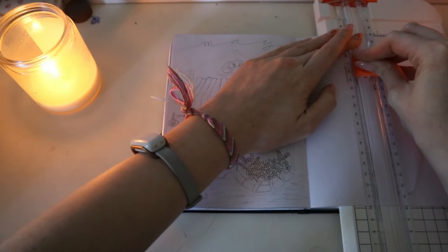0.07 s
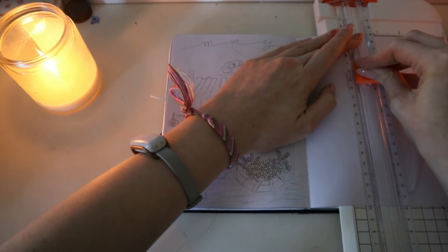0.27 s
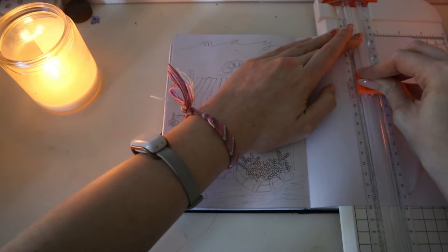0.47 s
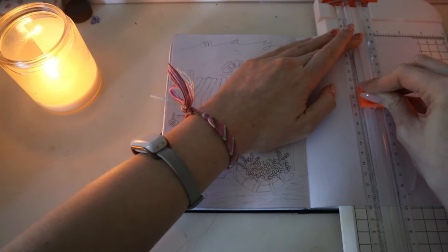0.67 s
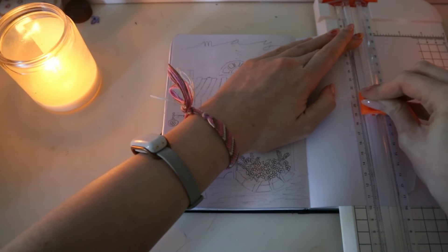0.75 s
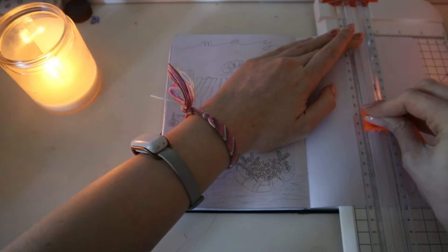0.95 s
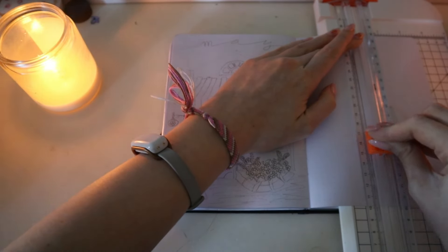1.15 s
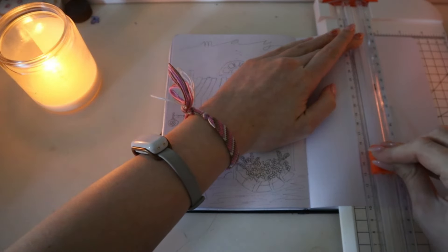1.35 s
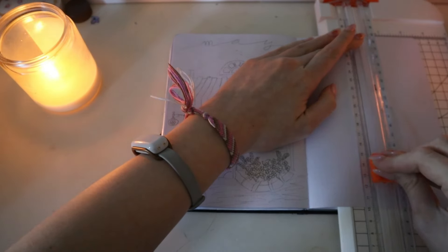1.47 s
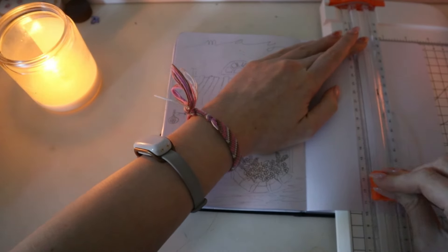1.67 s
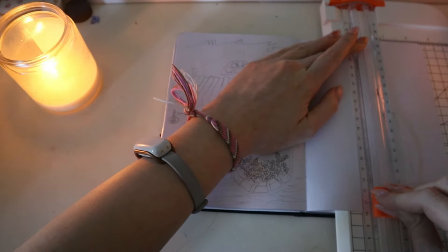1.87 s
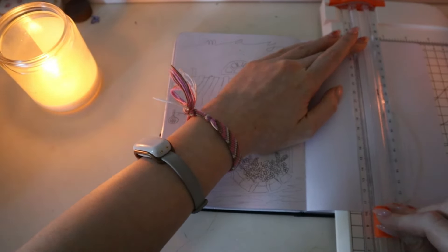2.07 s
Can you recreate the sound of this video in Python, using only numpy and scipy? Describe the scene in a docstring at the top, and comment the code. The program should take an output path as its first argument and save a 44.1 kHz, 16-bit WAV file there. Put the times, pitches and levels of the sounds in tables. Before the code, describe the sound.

A paper trimmer blade slices along its rail in one continuous, bright, uneven hiss from 0 to about 2.05 seconds, slightly right of centre. A small tick comes at 0.2, then rougher plastic rubbing. A wavering squeak rises from 0.56 to 0.78. Rubbing eases after 1.2; a sharp click and dull knocks cluster at 1.57-1.63, with lighter ticks at 1.72 and 1.79. Quiet, dry room, faint low hum.

```python
"""Paper trimmer on a desk

A blade carriage is drawn slowly down its rail in a quiet room, heard in stereo a little to the right.
Paper fibres tear: random clicks and noise excite a broad hiss and the modes of ruler arm and sheet.
The carriage rubs and once squeaks on the rail by stick-slip, and catches with knocks that ring modes.
Filtered noise makes the room tone and the appliance hum below; feedback delays make the room's echo.
"""
import sys
import numpy as np
from scipy import signal
from scipy.fft import rfft, irfft, next_fast_len
from scipy.io import wavfile

SR = 44100
rng = np.random.default_rng(int(sys.argv[2]) if len(sys.argv) > 2 else 0)


def output_pcm(signal):
    """Save a mono or channel-first signal as 16-bit PCM at the path in sys.argv[1].

    Samples are clipped to [-1, 1] before scaling.
    """
    pcm = np.clip(np.atleast_2d(signal).T, -1, 1) * 32767
    wavfile.write(sys.argv[1], SR, np.round(pcm).astype(np.int16))


def how_loud(loudness_db):
    """Turn decibels into a plain amplitude multiplier (0 dB gives 1, 20 dB gives 10)."""
    steps = np.asarray(loudness_db, float) / 20
    return 10 ** steps


N = 92610


def rms_one(x):
    """Scale to rms 1."""
    return x / np.sqrt(np.mean(x ** 2) + 1e-20)


def in_time(rows):
    """Columns of a curve table, sample by sample."""
    s, *columns = np.transpose(rows)
    return [np.interp(np.arange(N) / SR, s, c) for c in columns]


def at_hz(points, hz):
    """Read a table on a log-frequency axis."""
    table_hz, values = np.array(points).T
    return np.interp(np.log(hz), np.log(table_hz), values)


def drift(rate_hz):
    """Slow chance: noise through two equal one-pole low-passes at rate_hz, spread 1."""
    r = np.exp(-8 * np.pi * rate_hz / SR)  # drawn at a quarter of the sample rate
    slow = signal.lfilter([1], [1, -2 * r, r * r], rng.standard_normal(N // 4 + 8002))[8000:]
    return np.interp(np.arange(N) / 4, np.arange(len(slow)), rms_one(slow))


def colour(x, spectrum):
    """Shape by a spectrum table."""
    hz = np.maximum(np.fft.rfftfreq(N, 1 / SR), 1)
    return irfft(rfft(x) * how_loud(at_hz(spectrum, hz)), N)


def butter_filter(x, order, hz, kind):
    """Butterworth filter."""
    return signal.sosfilt(signal.butter(order, hz, kind, fs=SR, output="sos"), x)


def resonate(x, hz, width):
    """Two-pole resonance with gain 1 on top."""
    r = np.exp(-np.pi * width / SR)
    poles = [1, -2 * r * np.cos(2 * np.pi * hz / SR), r * r]
    return signal.lfilter(np.array([1, 0, -1]) * (1 - r * r) / 2, poles, x)


def ring(clicks, modes):
    """Clicks set every mode of a body ringing; each mode decays by 60 dB in its t60 [s]."""
    out = 0
    for hz, db, t60 in modes:
        r, w = how_loud(-60 / (t60 * SR)), 2 * np.pi * hz / SR
        out = out + how_loud(db) * signal.lfilter([0, np.sin(w)], [1, -2 * r * np.cos(w), r * r], clicks + 1e-18)
    return out


def grains(rate, spread_db):
    """Random clicks, rate per second on average, of uneven size and sign."""
    size = how_loud(spread_db * np.minimum(rng.exponential(1, N), 5)) * rng.choice([-1, 1], N)
    return rms_one(size * (rng.random(N) < rate / SR))


def along_rail(force, modes, depth_db):
    """Each mode swells and fades as the carriage passes its antinodes and nodes."""
    carriage_cm_per_s, wander_db = 14, 1.4
    cm = carriage_cm_per_s * np.arange(N) / SR
    total = 0
    for k, (hz, width, db, antinode_cm, spacing_cm) in enumerate(modes):
        swell_db = depth_db * np.cos(2 * np.pi * (cm - antinode_cm) / spacing_cm)
        gain = how_loud(db + swell_db + wander_db * drift(4.3))
        total = total + (-1) ** k * gain * resonate(force, hz, width)
    return rms_one(total)


def sheet_modes(spectrum):
    """Many small modes of the sheet at chance pitches, their levels following the hiss spectrum."""
    count, low_hz, top_hz, width_hz = 44, 1516, 11978, 35
    pitch, place, spacing = rng.random((count, 3)).T
    hz = low_hz + (top_hz - low_hz) * (np.arange(count) + pitch) / count
    return [(f, width_hz, at_hz(spectrum, f), 30 * p, 4.9 + 12 * s) for f, p, s in zip(hz, place, spacing)]


def sinking_ring():
    """A ring of the sheet that sinks as the cut lengthens: narrow noise carried on a falling pitch."""
    # (time [s], pitch [Hz], level relative to the hiss treble [dB])
    sinking_curve = [(.9, 11280, -35), (1.05, 10900, -12), (1.3, 10360, -7), (1.55, 9960, -7),
                     (1.85, 9760, -6.5)]
    spread_hz = 300  # low-pass of the noise on the carrier
    hz, db = in_time(sinking_curve)
    turn = 2 * np.pi * np.cumsum(hz) / SR
    return how_loud(db) * (drift(spread_hz) * np.cos(turn) + drift(spread_hz) * np.sin(turn))


def cut():
    """Tearing fibres excite a broad hiss, the modes of the arm and of the sheet; direct and diffuse parts."""
    # blade in the paper: (time [s], treble level [dB], lower treble relative to it [dB])
    cut_curve = [(0.0, -44, 2), (0.15, -47.5, -6), (0.25, -45.5, 1), (0.3, -42.5, -5.5), (0.33, -48, 2),
                 (0.53, -40.5, -5), (0.64, -41, 2), (0.72, -42, -0.5), (0.81, -38.5, -3.5),
                 (0.92, -43, -1.5), (1.04, -39.5, -3), (1.11, -41, -0.5), (1.19, -38.5, -3.5),
                 (1.6, -45.5, 1), (1.68, -41.5, -2), (1.69, -49, -0.5), (1.75, -40.5, -3),
                 (1.76, -47.5, 0.5), (1.82, -39.5, -2), (1.85, -44, -2.5), (1.91, -42.5, -1),
                 (1.95, -49.5, 1), (1.97, -40.5, -3), (2.03, -44, -3), (2.05, -62, 10), (2.1, -70, 10)]
    # hiss of the sheet: (frequency [Hz], relative density [dB per Hz])
    sheet_spectrum = [(760, -17), (1300, -9.5), (1980, -1), (2300, -4.5), (2600, -6.5), (3790, -2.5),
                      (5260, -1), (6580, 0.5), (8940, -2.5), (10500, 5), (12100, -5), (14900, -18)]
    # modes of rail and ruler arm, driven best where the blade crosses their antinodes:
    # (frequency [Hz], width [Hz], level [dB], an antinode along the cut [cm], antinode spacing [cm])
    arm_rail_modes = [(1447, 81, -0.5, 4.1, 27), (1800, 47, 7.5, 15.4, 10.8), (2392, 84, 4.5, 28, 23.2),
                      (2808, 164, 8, 2.2, 41.7), (2960, 190, -1.5, 10.4, 34), (3182, 50, 9, 32.4, 47),
                      (3745, 114, 2.5, 16.1, 28), (4210, 97, 8, 30, 80), (4520, 142, -4.5, 13.9, 10.8),
                      (4760, 37, 8.5, 25, 15.5), (5550, 37, 0, 14, 38), (5720, 60, 6, 5.1, 70),
                      (6605, 146, 4.5, 25.8, 9.7), (7350, 130, -18, 4.4, 11.5), (7400, 230, 6, 0.79, 33.3),
                      (7950, 140, 0, 20.5, 18), (8087, 110, 11, 2.7, 13.2), (8620, 320, 10, 5.9, 17.1),
                      (9380, 68, 8.5, 5.8, 15.4), (9780, 180, 9.5, 30, 24.6), (9790, 250, 8, 10.2, 5.3),
                      (11800, 69, 9, 16, 28)]
    # a hollow in the hiss: (time [s], share removed [0-1])
    hollow_curve = [(0, 0.7), (.15, 0.71), (.26, 0.86), (.3, 0.045), (.8, 0.24), (1.0, 0.24), (1.1, 0.1),
                    (1.3, 0.19), (1.6, 0.37), (1.8, 0.35), (2.1, 0.1)]
    # highest treble: (time [s], level change [dB])
    top_curve = [(0, 3), (.9, -3), (1.35, -6), (1.5, -1), (1.7, -1), (2.1, -12)]
    fibres_per_s, fibre_spread_db, flutter_db = 9000, 1.5, 0.51
    hollow_hz, hollow_width_hz, split_hz, top_from_hz = 4940, 2740, 3550, 15200

    # row 0 is the direct sound, rows 1 and 2 feed the two diffuse channels
    fibres = np.array([grains(fibres_per_s, fibre_spread_db), rng.standard_normal(N), rng.standard_normal(N)])
    hiss = rms_one(colour(fibres, sheet_spectrum))
    arm = along_rail(fibres, arm_rail_modes, 6.5)
    sheet = along_rail(fibres, sheet_modes(sheet_spectrum), 13)
    sound = hiss + arm + how_loud(-7) * sheet
    removed = np.clip(in_time(hollow_curve)[0], 0, 1)
    sound = sound - removed * resonate(sound, hollow_hz, hollow_width_hz)

    low = rms_one(butter_filter(sound, 4, split_hz, "low"))
    high = rms_one(butter_filter(sound, 4, split_hz, "high"))
    top = signal.sosfiltfilt(signal.butter(2, top_from_hz, "high", fs=SR, output="sos"), high)
    high = high + (how_loud(in_time(top_curve)[0]) - 1) * top
    high[0] += sinking_ring()
    level_db, low_db = in_time(cut_curve)
    flutter = flutter_db * (drift(9.4) + drift(33.0))
    return how_loud(level_db + flutter) * (high + how_loud(low_db) * low)


def rub():
    """Uneven slips of the carriage ring the rail."""
    # carriage rubbing on the rail: (time [s], level [dB])
    rub_curve = [(0, -41.5), (.18, -46.5), (.215, -35), (.26, -43), (.3, -33.5), (.34, -41), (.42, -40.5),
                 (.54, -36), (.65, -36), (.74, -35.5), (.8, -34), (.93, -38), (1.03, -35), (1.06, -36),
                 (1.12, -34), (1.22, -42.5), (1.41, -44), (1.44, -48.5), (1.53, -50), (1.6, -47.5),
                 (1.75, -49.5), (1.79, -43), (1.84, -54.5), (2.03, -58.5), (2.1, -70)]
    # rail modes:
    # (frequency [Hz], width [Hz], level [dB], an antinode along the cut [cm], antinode spacing [cm])
    rail_modes = [(536, 106, -16, 1.6, 22), (688.5, 83, -9, 25, 96), (759, 78, -3, 8.2, 9.4),
                  (832, 92, -1, 19.4, 47), (910, 101, -2, 18.5, 37), (981, 109, -2, 14.7, 20),
                  (1070, 113, -3, 2.7, 12.35), (1138, 93, -4.5, 4.1, 12.2), (1274, 110, -12.5, 2.2, 34)]
    slips_per_s, slip_spread_db, node_depth_db = 2200, 2, 2.5
    level_db, = in_time(rub_curve)
    rings = along_rail(grains(slips_per_s, slip_spread_db), rail_modes, node_depth_db)
    return how_loud(level_db) * rms_one(butter_filter(rings, 2, [480, 1450], "band"))


def squeak():
    """Regular stick-slip: a wavering tone with broken, blurred overtones."""
    # (time [s], pitch [Hz], level [dB], second partial level [dB], third partial level [dB])
    squeak_curve = [(.557, 849.6, -35, -58, -52), (.56, 856.4, -30, -51, -40), (.574, 848, -22, -41.5, -45),
                    (.582, 884, -27.5, -37, -52), (.589, 959.5, -31.5, -52, -44), (.6, 986, -33, -53, -45),
                    (.612, 873, -27, -32.5, -55), (.618, 833, -23.5, -56, -40),
                    (.624, 763.6, -31, -36, -42), (.64, 759, -24.5, -37, -40), (.646, 759, -37, -36, -63),
                    (.652, 795, -32, -47, -36), (.66, 788.6, -24.5, -36, -36.5),
                    (.67, 818.5, -25.5, -52, -38), (.679, 848, -20.5, -32.5, -49),
                    (.688, 896, -24.5, -33.5, -47.5), (.7, 883, -25.5, -36, -45),
                    (.718, 890, -25, -31.5, -39), (.73, 1003, -29, -43, -48), (.738, 1087, -34, -37.5, -43),
                    (.744, 1087, -42, -46, -42), (.751, 1125, -25, -36, -49), (.76, 1124, -37, -38, -52),
                    (.773, 1167, -24.5, -42, -59), (.78, 1177, -42, -38, -62)]
    # higher partials: (multiple of the pitch [1], level relative to the third [dB])
    higher_partials = [(4, -8), (5, -12.5)]
    jitter_share, shimmer_db = .007, .7
    overtone_shimmer_db, overtone_blur_rad = 2.2, .4
    hz, level_db, second_db, third_db = in_time(squeak_curve)
    turn = 2 * np.pi * np.cumsum(hz * (1 + jitter_share * drift(140.0))) / SR
    tone = how_loud(level_db + shimmer_db * drift(85.0)) * np.sin(turn)
    overtones = [(2, second_db), (3, third_db)]
    overtones += [(round(k), third_db + db) for k, db in higher_partials]
    for k, db in overtones:
        gain = how_loud(db + overtone_shimmer_db * drift(90.0))
        tone = tone + gain * np.sin(k * turn + overtone_blur_rad * drift(120.0))
    t = np.arange(N) / SR
    sounding = (t > squeak_curve[0][0]) & (t < squeak_curve[-1][0])
    return np.sqrt(2) * tone * sounding  # levels are rms


def knocks():
    """The carriage catches: ticks on the arm, snaps at the blade, thuds into the base."""
    # knocks of the carriage: (time [s], strength of the push [dB], softness [ms])
    knock_events = [(0.207, -27, .15), (1.5746, -15.5, 0.11), (1.583, -37, 0.16), (1.633, -27.5, 0.18),
                    (1.786, -29, 0.12)]
    # thin snaps at the blade: (time [s], strength of the click [dB])
    snap_events = [(1.5745, -36), (1.6326, -29.5), (1.724, -35)]
    # thuds into the base: (time [s], strength of the push [dB])
    thud_events = [(1.574, -40), (1.5817, -33), (1.5861, -35), (1.596, -39), (1.5993, -31), (1.6128, -34),
                   (1.63, -41)]
    # modes of arm, blade and base: (frequency [Hz], level [dB], decay by 60 dB [s])
    arm_modes = [(846, -14, 0.031), (980, -10.5, 0.021), (1085, -10.5, 0.059), (2300, -14, 0.018),
                 (3800, -35, 0.0049)]
    blade_modes = [(2800, -5, .009), (3500, -3, .009), (4300, -2, .01), (4900, -6, .008)]
    base_modes = [(140, -8, 0.05), (242, 0, 0.03), (348, 0, 0.018), (420, -8, .015)]
    ticks, snaps, pushes = np.zeros((3, N))
    for s, db, soft_ms in knock_events:
        r = np.exp(-1000 / (max(soft_ms, .01) * SR))
        ticks[int(s * SR):][:200] += how_loud(db) * (1 - r) * r ** np.arange(200)
    for s, db in snap_events:
        snaps[int(s * SR)] = how_loud(db)
    for s, db in thud_events:
        pushes[int(s * SR):][:40] += how_loud(db) * np.hanning(40) / 20
    return ring(ticks, arm_modes) + ring(snaps, blade_modes) + ring(pushes, base_modes)


def room(x):
    """Six feedback delays a side, duller on every round."""
    t60_s, wall_cut_hz = 0.19, 6900
    size = next_fast_len(N + SR // 2)
    w = 2 * np.pi * np.fft.rfftfreq(size, 1 / SR)
    out = np.zeros((2, len(w)), complex)
    for k, lag in enumerate(rng.uniform(.008, .03, 12)):
        wall = 1 / (1 + 1j * w / (2 * np.pi * wall_cut_hz))
        back = how_loud(-60 * lag / t60_s) * np.exp(-1j * w * lag) * wall
        out[k % 2] += (-1) ** (k // 2) * back / (1 - back)  # all rounds summed
    return irfft(out * rfft(x, size), size)[:, :N]


def room_tone():
    """Broad room noise, alike on both sides in the bass, and wavering hum lines, slowly swelling."""
    # (frequency [Hz], relative density [dB per Hz])
    tone_spectrum = [(15, -51), (25, -12), (208, -7), (414, -11), (472, -13), (1470, -16), (1970, -20.5),
                     (3830, -28), (4600, -25), (14000, -32.5)]
    # (frequency [Hz], left-right likeness [0-1])
    likeness = [(30, .99), (90, 0.87), (180, 0.86), (350, 0.14), (1000, 0.078), (8000, 0.09)]
    # appliance hum: (frequency [Hz], width of each of two resonances [Hz], level [dB])
    hum_lines = [(62.4, 27, -53), (126.7, 21, -53.5), (239.6, 50, -62)]
    broad_db, steady_hum_db, swell_db_per_s = -47, -54.5, 1
    hz = np.maximum(np.fft.rfftfreq(N, 1 / SR), 1)
    alike = np.clip(at_hz(likeness, hz), 0, 1)
    mid, side = rfft(rng.standard_normal((2, N))) * how_loud(at_hz(tone_spectrum, hz))
    broad = irfft(np.sqrt(1 + alike) * mid + np.sqrt(1 - alike) * side * [[1], [-1]], N)
    hum = 0
    for c, width, db in hum_lines:
        line = resonate(resonate(rng.standard_normal(N + SR), c, width), c, width)[SR:]
        hum = hum + how_loud(db) * rms_one(line)
    t = np.arange(N) / SR
    # steadier part of the lowest line, its phase wandering
    steady = np.sqrt(2) * np.sin(2 * np.pi * hum_lines[0][0] * t + drift(1.2))
    hum = hum + how_loud(steady_hum_db) * steady
    return how_loud(swell_db_per_s * t) * (how_loud(broad_db) * rms_one(broad) + hum)


def scene():
    """The trimmer stands a little to the right: the left side hears it later and softer."""
    left_lag_s, pan_db = 26e-6, -2  # left against right
    diffuse_db, room_db = -9, -18.5
    direct, *diffuse = cut()
    near = direct + rub() + squeak() + knocks()
    w = 2 * np.pi * np.fft.rfftfreq(N, 1 / SR)
    halves = np.array([[.5], [-.5]])
    sides = irfft(rfft(near) * np.exp(-1j * w * left_lag_s * halves), N)
    # part of the hiss that differs between the sides
    sides = sides + how_loud(diffuse_db) * butter_filter(diffuse, 1, [5200, 8700], "band")
    return sides * how_loud(pan_db * halves) + how_loud(room_db) * room(near) + room_tone()


def top_cut(x):
    """Nothing passes above the cut-off."""
    return signal.sosfilt(signal.butter(12, 15040, fs=SR, output="sos"), x)


def record(dry):
    """Top and bottom roll off."""
    no_rumble = butter_filter(dry, 2, 33, "high")
    mix = butter_filter(no_rumble, 4, 14000, "low")
    return top_cut(mix)


dry = scene()
out = record(dry)
output_pcm(out)
```